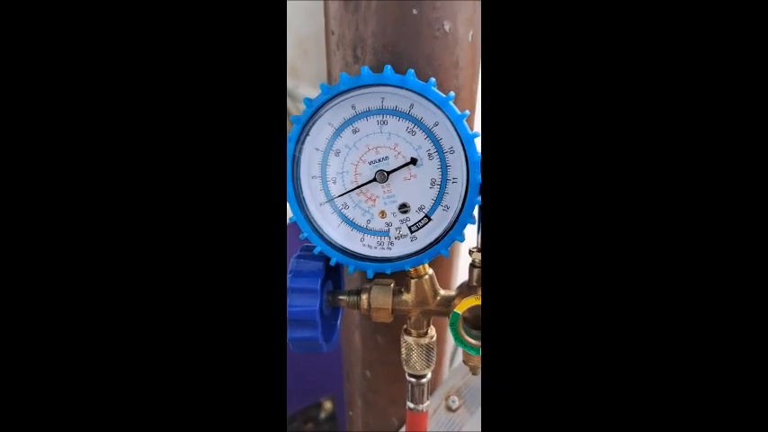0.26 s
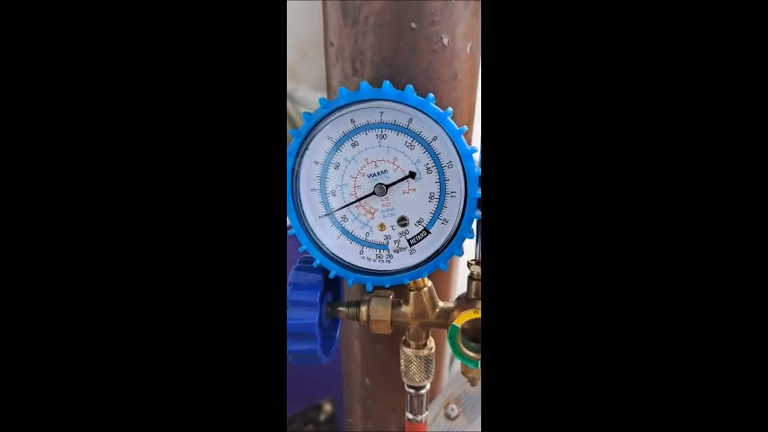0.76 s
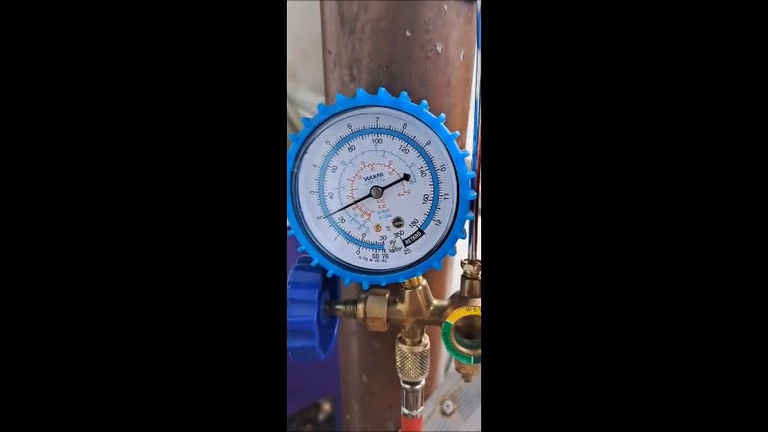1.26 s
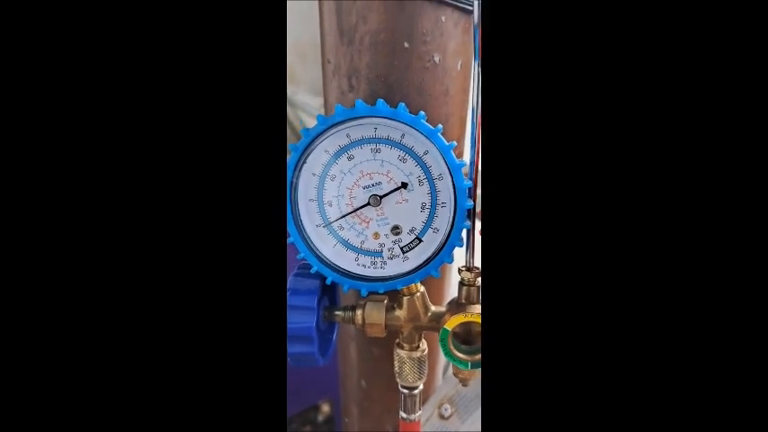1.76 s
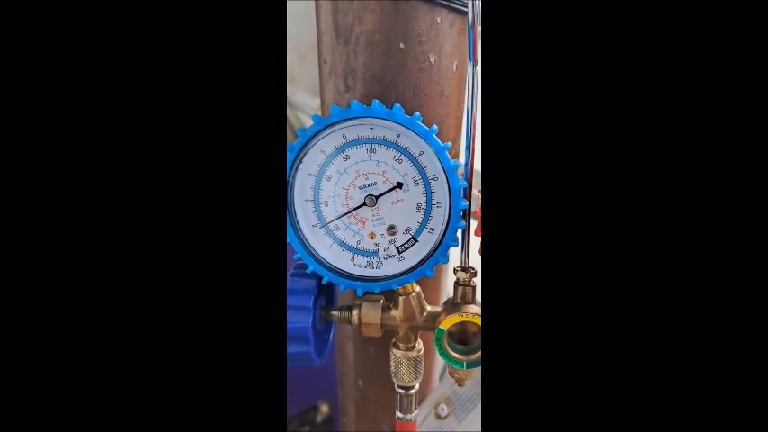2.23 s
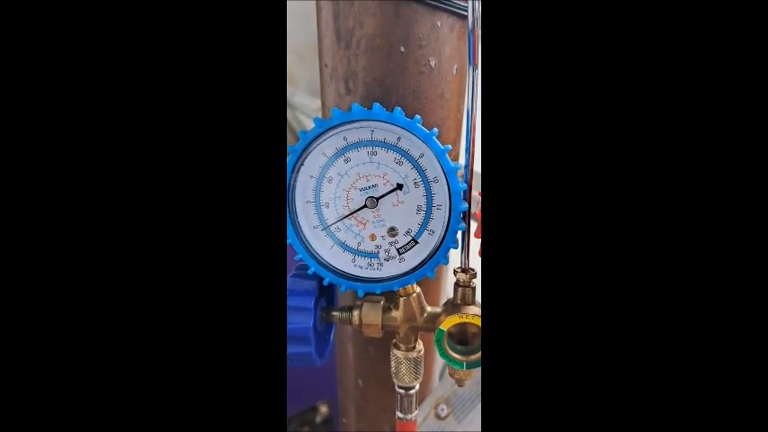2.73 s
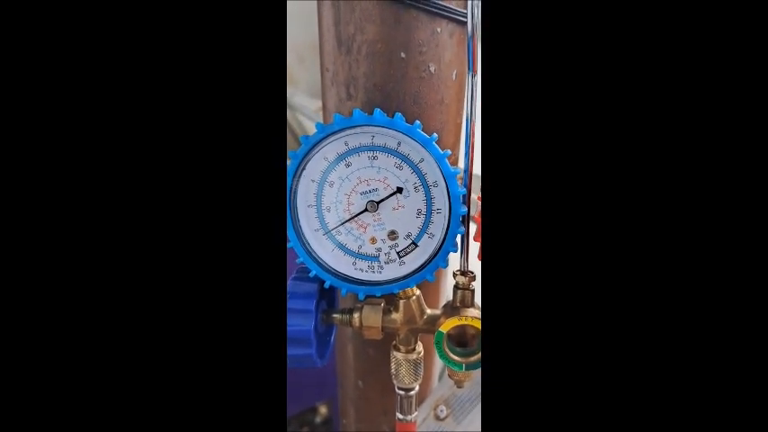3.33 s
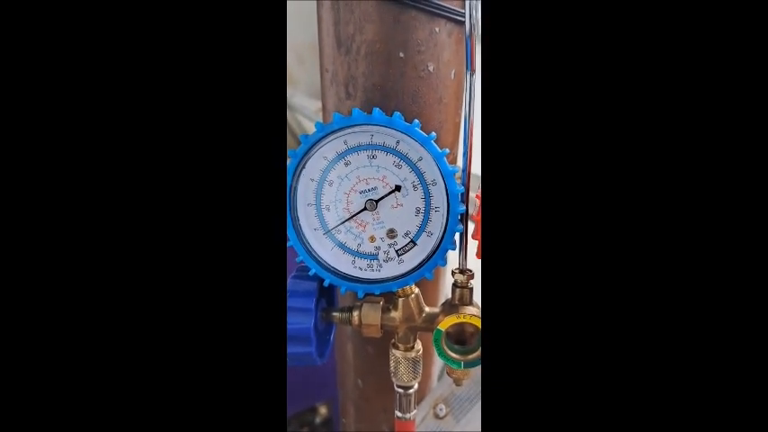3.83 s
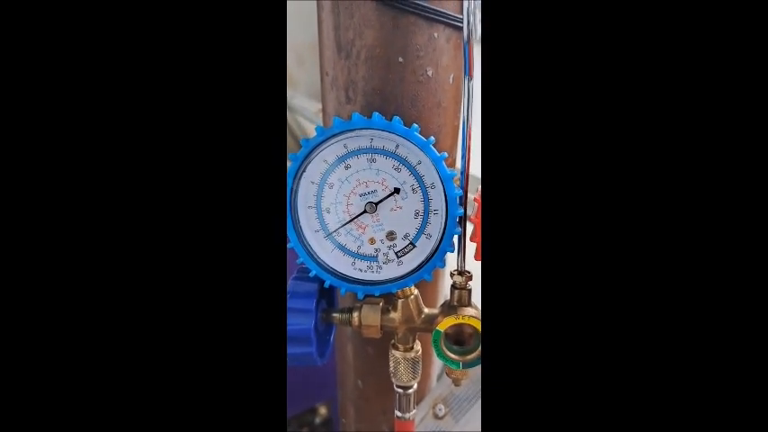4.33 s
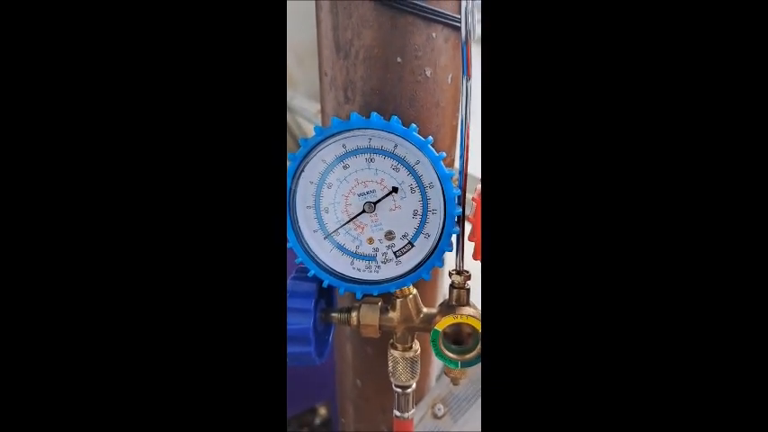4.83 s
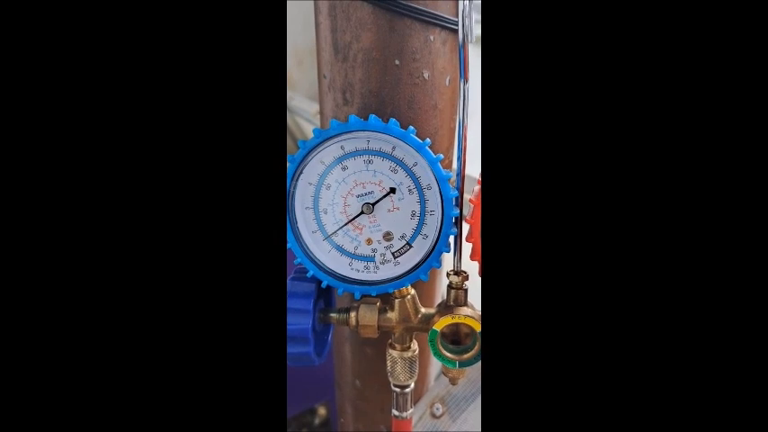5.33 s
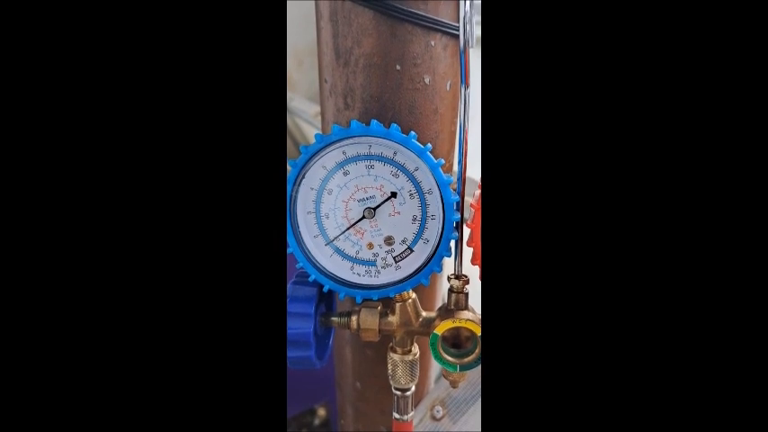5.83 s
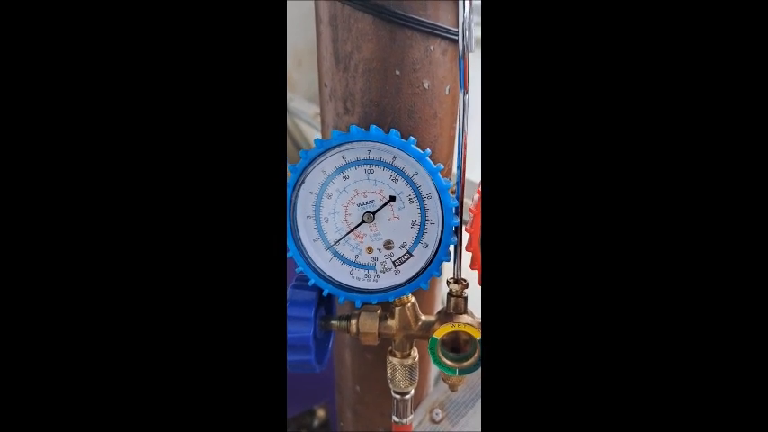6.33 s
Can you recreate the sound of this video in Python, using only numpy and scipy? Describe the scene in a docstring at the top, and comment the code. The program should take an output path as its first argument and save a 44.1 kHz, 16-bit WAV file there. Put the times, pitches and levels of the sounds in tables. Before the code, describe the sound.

A freezer compressor runs close by throughout, its motor and fan humming together with a quick throb over softly rushing air and droning cabinet panels. A heavy, deep rumble is the loudest sound, creeping up in pitch over the first two seconds. It eases at about 2.5 seconds, swells again around 4.3 and 5 seconds, then settles lower. A thin gas hiss in the pipes holds for about two seconds and slowly dies away. Faint, small metal ticks are scattered through the first three seconds, and a few soft scuffs fall mostly between 2.4 and 5 seconds. A hollow hiss builds from about 3 seconds, turns brighter at 3.7, peaks just after 4 and fades by 5. A faint, high buzz from the steel shell grows from about 4.5 seconds. One light, dull knock with hardly any ring lands at about 6.5 seconds.

```python
"""Freezer compressor running

Close by, the motor's mains hum throbs against a fan's hum, and a piston makes the steel shell buzz.
A deep rumble swells and eases, rushing air stirs the cabinet panels, and gas hisses in the pipes.
A hollow hiss swells and passes, faint ticks and scuffs sound, and one light knock comes near the end."""
import sys
import numpy as np
from scipy import signal
from scipy.fft import rfft, irfft
from scipy.io import wavfile
from scipy.ndimage import uniform_filter1d

SR = 44100
rng = np.random.default_rng(int(sys.argv[2]) if len(sys.argv) > 2 else 0)


def store_pcm(level_fs):
    """Save levels as 16-bit WAV."""
    pcm = np.round(np.clip(level_fs, -1, 1) * 32767).astype(np.int16)
    wavfile.write(sys.argv[1], SR, np.atleast_2d(pcm).T)


N = 290178
TIME = np.arange(N) / SR
FREQ = np.maximum(np.fft.rfftfreq(N, 1 / SR), 1)
MAINS_HZ, AIR_USUAL_DB = 60, -36.5

# how loud both hums and the fan's octave are: time_s, hum_db, octave_db
HUM_LEVELS = [(0, -40.5, -61), (1, -40.5, -42.5), (2, -40, -42), (3.5, -41, -41.5), (4.2, -36, -47),
              (5.2, -38, -50.5), (6.58, -38.5, -50.5)]
# the pitch of the fan's hum: time_s, pitch_hz
FAN_PITCH = [(0, 124.95), (1.9, 124.92), (2.4, 125.15), (3, 124.95), (3.65, 125.45), (4.35, 124.8),
             (5.1, 125.35), (6.58, 125.5)]
# how strongly the air rushes: time_s, level_db
AIR_SWELLS = [(0, -37), (1.85, -40), (2.2, -39), (2.45, -35.5), (3, -38.5), (3.6, -38.5), (4.25, -33.5),
              (5.2, -37.5), (6.58, -37.5)]


def rumble():
    """A deep, throbbing drone that creeps up in pitch; a resonance briefly lifts one overtone."""
    # its slow swells: time_s, level_db
    swells = [(0, -15), (.38, -18.5), (.98, -19), (1.2, -14), (1.48, -17), (1.7, -14), (1.95, -18),
              (2.15, -16.5), (2.42, -18), (2.56, -27.5), (3.0, -28), (3.17, -24.5), (3.32, -27),
              (3.45, -41), (3.7, -27.5), (4.12, -30), (4.33, -18), (4.55, -26), (4.95, -15.5),
              (5.12, -15.5), (5.5, -25), (5.85, -22.5), (6.03, -28), (6.24, -31.5), (6.35, -24.5),
              (6.58, -26.5)]
    # its brief dips: time_s, depth_db, half_width_s
    dips = [(.13, -8, 0.039), (2.78, -12, 0.032), (2.91, -9, 0.018), (3.0, -7.5, .03), (3.1, -14, 0.028),
            (3.23, -6, 0.026), (3.41, -10, 0.032), (3.58, -14, 0.039), (4.63, -6, .035), (6.17, -8, 0.025)]
    start_hz, settled_hz, settle_s = 51.65, 57, 1.05
    hz = settled_hz + (start_hz - settled_hz) * np.exp(-(TIME / settle_s) ** 2)
    phase = phase_of(hz + 0.36 * wander(12))
    overtone = gain(-21.5) * filtered(np.sin(3 * phase), resonance(154.3, 6.5) ** 2)
    dip_db = sum(db * np.exp(-((TIME - s) / half_width) ** 2) for s, db, half_width in dips)
    waver = gain(-44) * wander(16)  # shows most while the drone is weak
    return at_level(np.sin(phase) + overtone, -1.56) * (gain(curves(swells)[0] + dip_db) + waver)


def compressor():
    """The motor hums at twice the mains rate; each piston stroke rings the shell and puffs gas."""
    # how hard the shell buzzes: time_s, level_db
    buzz_levels = [(0, -66.5), (2, -65.5), (3.2, -68), (4.15, -66), (4.7, -56.5), (5.2, -63), (5.9, -58),
                   (6.58, -54.8)]
    # the steel shell's resonances: pitch_hz, width_hz, gain_db
    shell_modes = [(2220, 85, -27), (2456, 42, 2.5), (2735, 97, -5), (3040, 73, 1.5), (3200, 120, -7)]
    stroke_hz, partials_db = 58.9, [-1.35, -11.5, -19.5]
    hum = sum(at_level(np.sin(4 * np.pi * k * MAINS_HZ * TIME), db)
              for k, db in enumerate(partials_db, 1))
    hum *= gain(curves(HUM_LEVELS)[0])
    turns = phase_of(stroke_hz + 0.02 * wander(2.7)) / (2 * np.pi)
    strokes = np.diff(np.floor(turns), prepend=0) * gain(2 * wander(50))  # one uneven kick a turn
    shell = sum((-1) ** k * gain(db) * resonance(hz, width)
                for k, (hz, width, db) in enumerate(shell_modes))
    buzz = at_level(from_machine(filtered(strokes, shell * resonance(2480, 1200))), -0.3)
    puffs = room_noise() * np.exp(-(turns % 1) / 1.4)
    gas = at_level(filtered(puffs, resonance(2485, 520) ** 2), -1.3)
    return hum * pan(-0.52) + (buzz + gas) * gain(curves(buzz_levels)[0]) * pan(-1.2)


def fan():
    """An unsteady hum just above the mains hum, so the two throb about five times a second."""
    hum_db, octave_db = curves(HUM_LEVELS)
    phase = phase_of(curves(FAN_PITCH)[0])
    octave = np.sin(2 * phase + 0.15 * wander(4.86)) * gain(1.1 * wander(7.94))
    octave = at_level(octave, 0) * gain(octave_db)
    # a tone at the two hums' pitches added together beats with the octave
    sum_tone = at_level(np.sin(phase + 4 * np.pi * MAINS_HZ * TIME + 0.63 * wander(1.98)), -49.5)
    hum = np.sin(phase + 0.1 * wander(7.9)) * gain(wander(3.8))
    hum = at_level(hum, -0.86) * gain(hum_db)
    return from_machine(octave + sum_tone - hum)


def cabinet():
    """Swirling air keeps the panels droning unevenly, harder when it swells."""
    # resonances of the panels and hollows: pitch_hz, width_hz (widened below), level_db
    panels = [(49, 3.4, -46), (68.4, 14, -41.5), (111.3, 6.8, -44.5), (149, 20, -49), (169.4, 11.6, -51),
              (228, 26, -42.5), (247.8, 10, -47.5), (381, 37, -52), (439.4, 10.8, -52), (680, 16, -62),
              (1255, 146, -57.5)]
    drone = sum(at_level(filtered(machine_noise(), resonance(hz, 1.9 * width) ** 2), db)
                for hz, width, db in panels)
    swell_db = curves(AIR_SWELLS)[0] - AIR_USUAL_DB
    return drone * gain(0.5 * swell_db)


def rushing_air():
    """Air rushes from the machine, duller as it swells; each octave flickers by itself."""
    # the air's tone: frequency_hz, gain_db
    air_tone = [(25, -6), (70, -7.5), (170, -6), (300, -4.5), (430, -7), (620, -10.5), (860, -15),
                (1100, -14.5), (1750, -24.5), (2300, -25.5), (3700, -30), (4600, -31.5), (6200, -35.5),
                (15500, -45)]
    spectrum = rfft(machine_noise()) * tone_curve(air_tone)
    rush = 0
    for octave in range(4, 15):
        band = np.maximum(1 - np.abs(np.log2(FREQ) - octave), 0)
        rush += irfft(spectrum * band, N) * gain(0.96 * wander(40) + 0.28 * wander(10))
    air_db = curves(AIR_SWELLS)[0]
    treble_db = -0.5 - 0.42 * (air_db - AIR_USUAL_DB)  # the treble follows only part of a swell
    return with_treble(at_level(rush, 0), treble_db, above_hz=800) * gain(air_db)


def passing_hiss():
    """A hollow hiss swells, turns suddenly brighter and fades away."""
    # the hiss's tone: frequency_hz, gain_db
    hiss_tone = [(80, -16), (200, 2), (310, -7), (420, -1), (900, -6.5), (1110, -2), (1400, -4.5),
                 (1650, -12), (2350, -12.5), (3100, -14), (4500, -13.5), (6300, -22), (7600, -14.5),
                 (9000, -23), (15500, -26.5)]
    hiss = at_level(filtered(room_noise(), tone_curve(hiss_tone)), -41)
    hiss *= swell(full_s=3.734, hold_s=0.48, rise_db_per_s=16.5, fall_db_per_s=16.5)
    treble_db = np.interp(TIME, [3.73, 3.761], [-9, -4.5])
    hiss = with_treble(hiss + hollow_ring(), treble_db, above_hz=1800)
    return hiss * gain(1.13 * wander(22.14)) * pan(1.2)


def hollow_ring():
    """Resonances in the passing hiss flutter and glide up around their loudest moment."""
    # the resonances before the glide: pitch_hz, width_hz, gain_db
    hollow_modes = [(1080, 230, 1), (1345, 320, -8.5), (2420, 260, -10)]
    full_s, climb_hz, climb_s = 4.14, 65.4, 0.206
    cavity = sum(gain(db) * resonance(hz, width) ** 2 for hz, width, db in hollow_modes)
    ring = filtered(room_noise(), cavity)
    shift_hz = climb_hz * np.clip((TIME - full_s) / climb_s + .5, 0, 1)
    ring = np.real(signal.hilbert(ring) * np.exp(1j * phase_of(shift_hz)))  # slides every pitch up
    ring = at_level(ring * gain(2 * wander(18)), -41.5)
    return ring * swell(full_s, hold_s=0.071, rise_db_per_s=11.5, fall_db_per_s=46)


def knock():
    """One soft, dead contact: a single rounded push with hardly any ring."""
    start_s, contact_s = 6.4605, 0.0014
    push = np.sin(np.pi * np.clip((TIME - start_s) / contact_s, 0, 1)) ** 2
    return at_peak(filtered(push, resonance(510, 1500)), -18.5)


def scuffs():
    """Soft scuffs, each a burst of noise through one resonance."""
    # the scuffs: start_s, peak_db, pitch_hz, width_hz, fade_s
    events = [(.13, -42, 1710, 800, 0.93), (2.42, -34, 1280, 600, .19), (2.545, -38, 1320, 607, 0.096),
              (2.868, -34.5, 1050, 120.5, 0.17), (3.495, -37, 1120, 140, 0.14),
              (3.744, -37, 7000, 9010, 0.037), (3.764, -35, 1760, 700, .1), (4.79, -37, 1150, 450, 0.6)]
    return sum(at_peak(filtered(burst(start_s, fade_s), resonance(hz, width) ** 2), db)
               for start_s, db, hz, width, fade_s in events)


def pipe_ticks():
    """Small metal ticks: a dull contact with a short rasp rings the pipes, most near its own pitch."""
    # the ticks: start_s, peak_db, pitch_hz, ring_scale (multiplies ring_s)
    events = [(0.069, -43, 4150, .6), (.506, -48, 4400, .6), (0.873, -45, 3600, .6),
              (1.029, -41.5, 4700, 2), (1.912, -45, 3000, .6), (2.313, -39, 3030, .6),
              (2.547, -43, 3200, .8), (2.594, -47, 3400, 1.8), (2.711, -37, 3700, .5)]
    # the notes the pipes ring with: pitch_hz, gain_db, ring_s (time to fall 60 dB)
    pipe_modes = [(2580, -4, .012), (3000, -7, .01), (3500, -1, .02), (4350, 0, .024), (4900, -16, .01)]
    spread_octaves, dull_hz = 0.53, 5500
    out = 0
    for start_s, peak_db, pitch_hz, ring_scale in events:
        click = np.diff(1. * (TIME >= start_s), prepend=0)
        contact = click + gain(-10) * burst(start_s, fade_s=0.066)
        ring = 0
        for hz, db, ring_s in pipe_modes:
            nearness = np.exp(-(np.log2(hz / pitch_hz) / spread_octaves) ** 2)
            width_hz = np.log(1000) / (np.pi * ring_s * ring_scale)
            ring += gain(db) * nearness * resonance(hz, width_hz)
        out += at_peak(filtered(contact, ring / (1 + (FREQ / dull_hz) ** 6)), peak_db)
    return out


def singing_panel():
    """A loose panel sings, louder on each throb of the two hums."""
    pitch_hz, throb_db = 439, 5
    throb = -np.cos(phase_of(curves(FAN_PITCH)[0]) - 4 * np.pi * MAINS_HZ * TIME)
    note = np.sin(2 * np.pi * pitch_hz * TIME + 0.28 * wander(4.6))
    return from_machine(at_level(note * gain(throb_db * throb + 2.3 * wander(6)), -52.5))


def pipe_hiss():
    """Gas rings the pipes with a thin hiss that holds, then dies away."""
    # the bands of the hiss: pitch_hz, width_hz, level_db
    bands = [(1230, 270, -56), (2220, 860, -63.5), (3310, 300, -74), (4300, 410, -72), (5120, 580, -70),
             (7330, 700, -70)]
    hiss = sum(at_level(filtered(room_noise(), resonance(hz, width) ** 2), db) for hz, width, db in bands)
    return hiss * swell(full_s=0, hold_s=2.24, rise_db_per_s=0, fall_db_per_s=6) * pan(6)


def machine_noise():
    """Noise from the machine, direct and off the walls; the direct part is duller."""
    direct = filtered(rng.standard_normal(N), (1 + (FREQ / 1400) ** 2) ** -.25)
    return at_level(room_noise() + gain(1) * from_machine(direct), 0)


def room_noise(alike_hz=650):
    """Noise from all round: left and right are alike in the bass, unrelated in the treble."""
    likeness = np.exp(-(FREQ / alike_hz) ** 2)
    mid = filtered(rng.standard_normal(N), np.sqrt((1 + likeness) / 2))
    side = filtered(rng.standard_normal(N), np.sqrt((1 - likeness) / 2))
    return np.array([mid + side, mid - side])


def from_machine(x, lag_s=.00045):
    """Sound from the machine reaches the right microphone first."""
    return np.array([filtered(x, np.exp(-2j * np.pi * FREQ * lag_s)), x])


def burst(start_s, fade_s):
    """Noise that starts at once and falls 60 dB in fade_s."""
    fade = np.exp(-np.log(1000) * np.abs(TIME - start_s) / fade_s)
    return rng.standard_normal((2, N)) * (TIME >= start_s) * fade


def swell(full_s, hold_s, rise_db_per_s, fall_db_per_s):
    """A gain that climbs to 1, holds and falls away."""
    early, late = np.maximum(full_s - TIME, 0), np.maximum(TIME - full_s - hold_s, 0)
    return gain(-rise_db_per_s * early - fall_db_per_s * late)


def wander(rate_hz):
    """A smooth random drift, roughly 1 either side of zero."""
    hold = int(SR / rate_hz)
    steps = np.repeat(rng.standard_normal(N // hold + 1), hold)
    return 1.6 * uniform_filter1d(uniform_filter1d(steps, hold), hold)[:N]


def gain(db):
    """Turn decibels into a multiplier."""
    return 10 ** (np.asarray(db) / 20)


def at_level(x, db):
    """Scale to an average (rms) level."""
    return x * gain(db) / np.sqrt(np.mean(x ** 2))


def at_peak(x, db):
    """Scale to a peak level."""
    return gain(db) * x / np.abs(x).max()


def pan(left_db):
    """Two gains that put the left side left_db above the right."""
    return gain(np.array([[left_db], [-left_db]]) / 2)


def curves(table):
    """The columns of a table, joined by straight lines in time."""
    times, *columns = np.transpose(table)
    return [np.interp(TIME, times, column) for column in columns]


def phase_of(hz):
    """The running angle of something that turns at a changing rate."""
    return 2 * np.pi * np.cumsum(hz) / SR


def tone_curve(points):
    """A filter's response through (frequency_hz, gain_db) points."""
    hz, db = np.transpose(points)
    return gain(np.interp(np.log(FREQ), np.log(hz), db))


def resonance(hz, width_hz):
    """The response of something that rings at one pitch; narrower rings longer."""
    return 1 / (1 + 1j * (FREQ / hz - hz / FREQ) * hz / width_hz)


def filtered(x, response):
    """Weight each frequency of a sound by a response."""
    return irfft(rfft(x) * response, N)


def with_treble(x, treble_db, above_hz):
    """Raise or lower the treble."""
    body = filtered(x, 1 / (1 + (FREQ / above_hz) ** 4))
    return body + (x - body) * gain(treble_db)


def scene():
    """All sources at the two microphones."""
    machine = rumble() + compressor() + fan() + cabinet() + singing_panel()
    return machine + rushing_air() + pipe_hiss() + passing_hiss() + pipe_ticks() + scuffs() + knock()


def record(dry):
    """The sound fades in and out; the phone brightens the right side and cuts the very bottom and top."""
    # the right microphone's tone, with a peak and a notch from its opening: frequency_hz, gain_db
    right_tone = [(55, 1.85), (270, 1.5), (500, 3), (900, 3.5), (1300, 6), (2900, 6.5), (3400, 7.5),
                  (3740, 6.5), (4200, 8), (6200, 9), (7600, 13.5), (8150, 8.5), (8750, -28), (10000, 5),
                  (12300, 10.5), (15500, 8)]
    fade_s, bottom_hz, top_hz = .003, 20, 15750
    left, right = dry * np.minimum(np.minimum(TIME, TIME[::-1]) / fade_s, 1)
    stereo = np.array([left, filtered(right, tone_curve(right_tone))])
    stereo = signal.sosfilt(signal.butter(2, bottom_hz, "high", fs=SR, output="sos"), stereo)
    return signal.sosfilt(signal.ellip(12, .2, 80, top_hz, fs=SR, output="sos"), stereo)


dry = scene()
out = record(dry)
store_pcm(out)
```